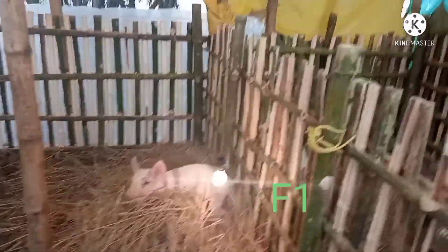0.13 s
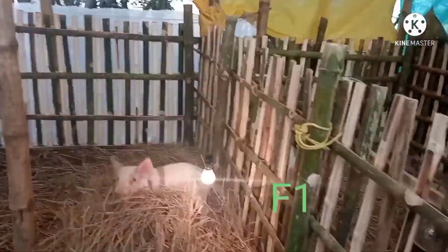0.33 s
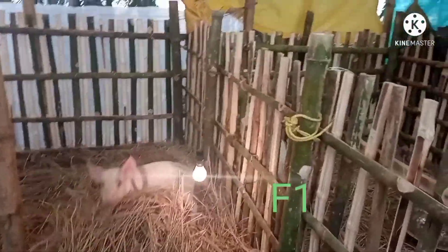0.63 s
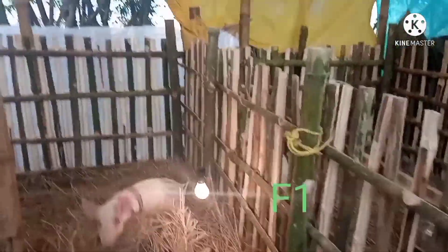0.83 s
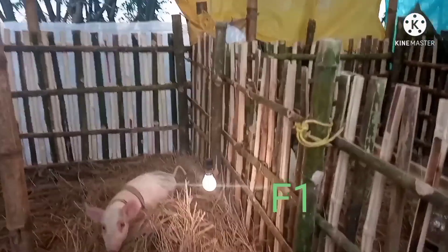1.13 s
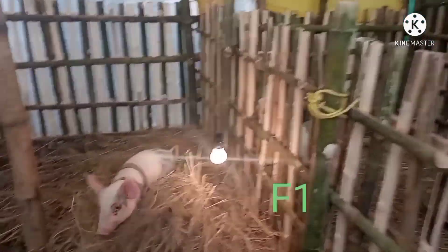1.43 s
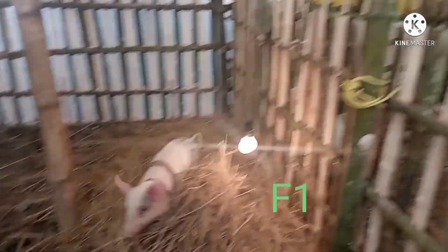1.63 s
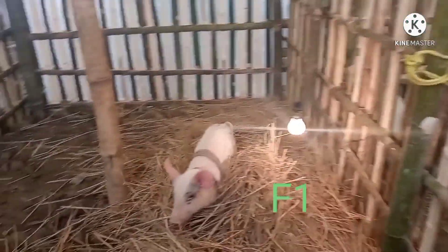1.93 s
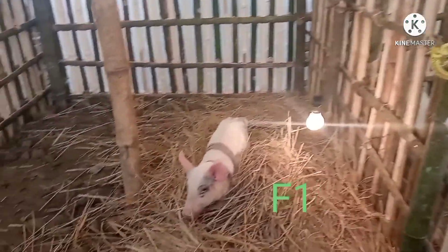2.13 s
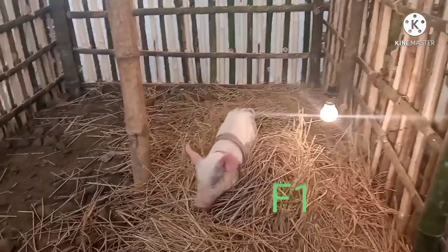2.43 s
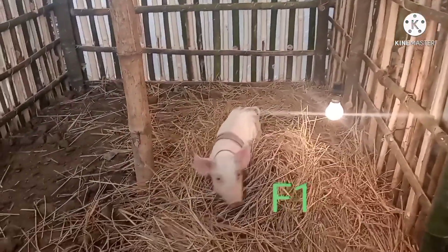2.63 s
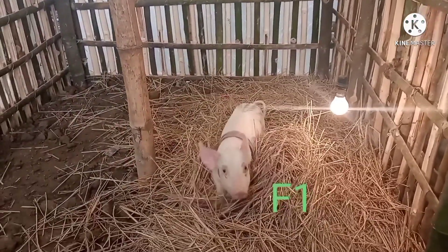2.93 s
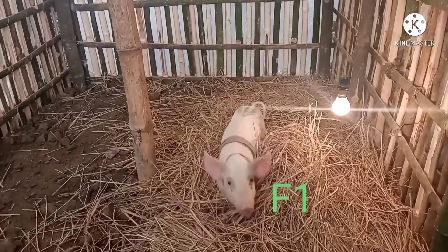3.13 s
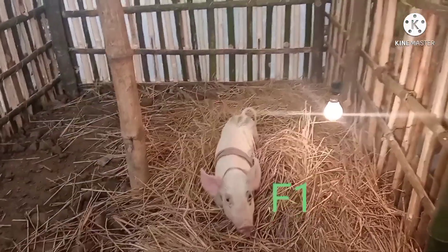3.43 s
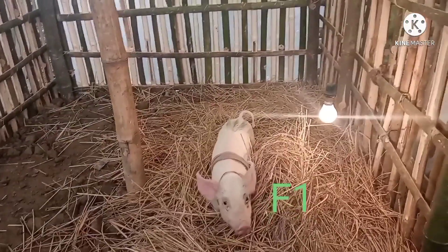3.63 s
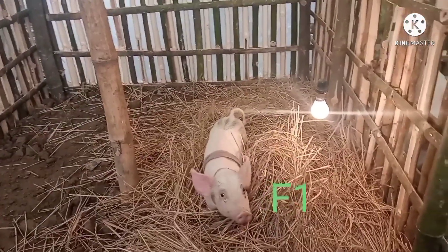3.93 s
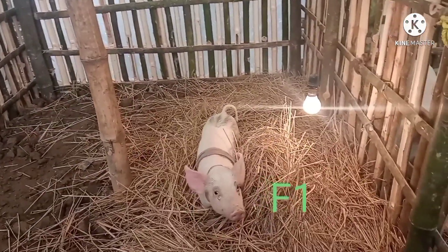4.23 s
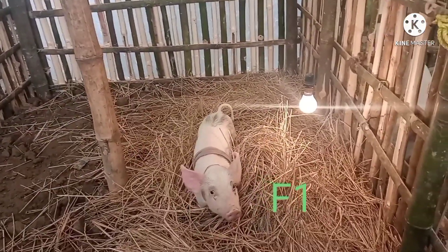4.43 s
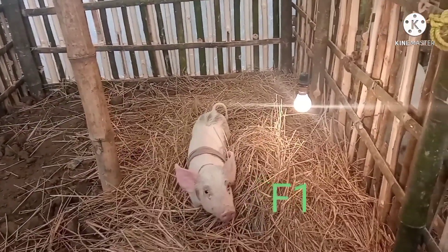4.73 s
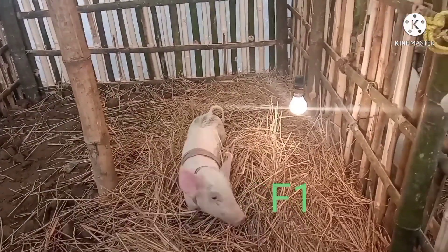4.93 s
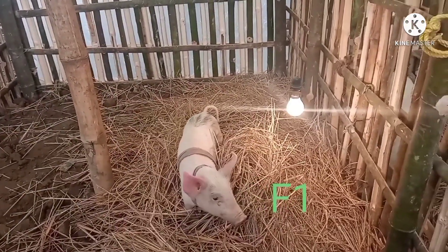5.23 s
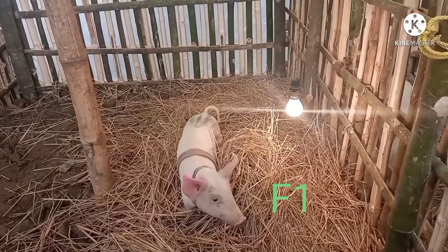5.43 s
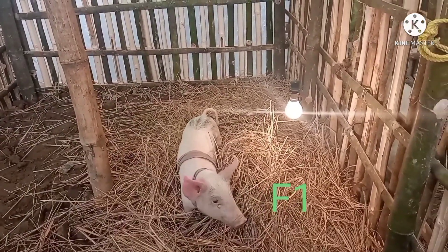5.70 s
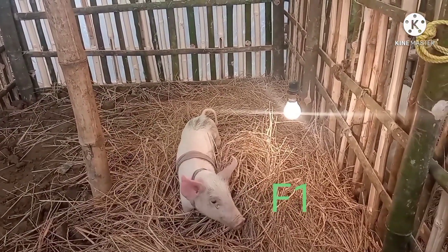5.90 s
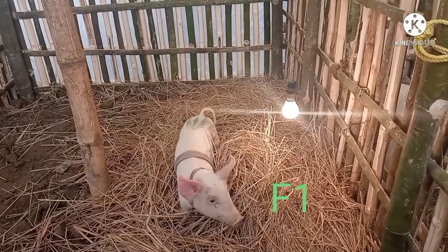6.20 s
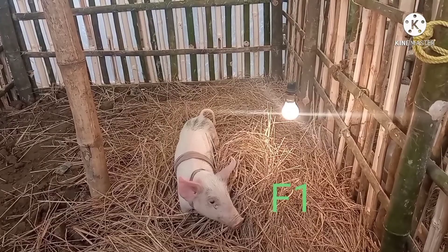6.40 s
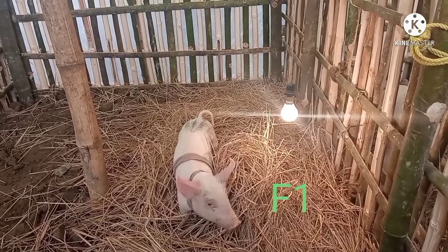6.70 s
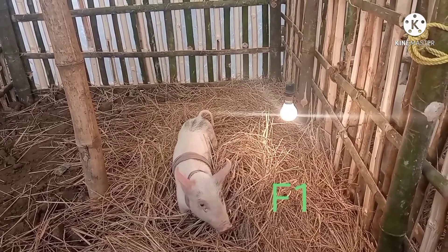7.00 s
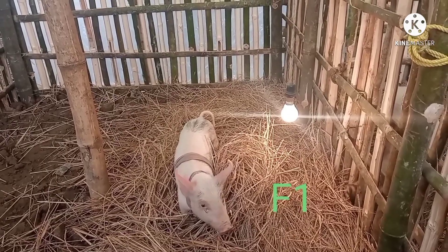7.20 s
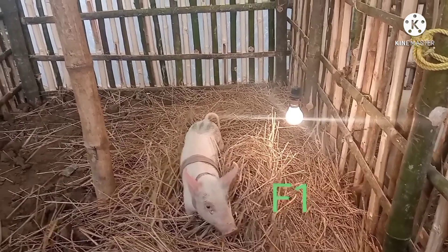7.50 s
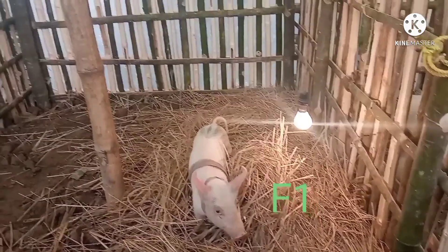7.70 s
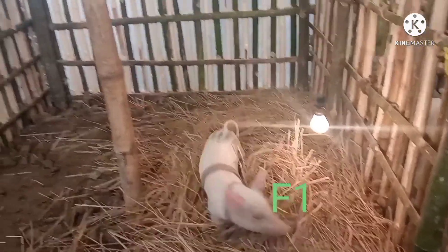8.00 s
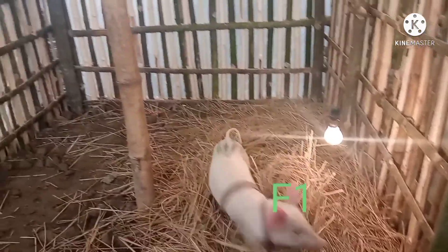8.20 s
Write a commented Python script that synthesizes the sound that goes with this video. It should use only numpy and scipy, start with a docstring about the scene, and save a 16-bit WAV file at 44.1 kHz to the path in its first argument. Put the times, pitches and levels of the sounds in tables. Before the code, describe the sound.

Dry straw rustles from the start, with two quick clicks in the first 0.3 seconds. The crackling hiss comes in swells and is strongest around 1.5 seconds. A piglet gives short, soft grunts, a very faint one near 0.8 seconds and clearer ones at about 1.2, 3.1, 3.6 and 5.5 seconds. From about 2.4 seconds a faint, distant bird repeats a falling whistle roughly once a second, joined by tiny peeps and coos. After 4 seconds the straw settles into lighter shuffles, scuffs and dull far knocks. At about 6.9, 7.5 and 8.1 seconds come three hard, close knocks on wood, by far the loudest sounds, each cracking and ringing with a short echo. A sharp tick and another grunt fall at 8 seconds, and the straw swells again at the end. A low outdoor hiss and rumble lies underneath throughout.

```python
"""A straw pen in a yard. A piglet grunts: uneven vocal-fold pulses and breath ring its throat,
mouth and snout. Wood is knocked three times, hard and near, cracking, ringing and echoing.
Birds whistle and coo far off. The straw rustles in swells of crackling hiss, with ticks,
scuffs and dull far knocks, over the yard's own hiss, murmur and rumble."""
import sys
import numpy as np
from scipy import signal
from scipy.io import wavfile
from scipy.ndimage import uniform_filter1d

SR = 44100
rng = np.random.default_rng(int(sys.argv[2]) if len(sys.argv) > 2 else 0)


def master(y):
    """Save y as 16-bit WAV."""
    cut = np.clip(np.atleast_2d(y).T, -1, 1)
    pcm = np.round(cut * 32767)  # scale
    wavfile.write(sys.argv[1], SR, pcm.astype(np.int16))


N = 368235

# Grunts: start_s, length_s, attack_s, level_db, lead_s, lead_rate_hz, body_rate_hz,
# mouth_start_hz, mouth_end_hz, mouth_db, rasp_db, rasp_tilt_db_per_octave, breath_share
GRUNTS = [(0.758, 0.1466, 0.08, -62, 0.00017, 96, 101.4, 630, 607, 3, -29, 0, .6),
          (1.213, 0.2094, 0.08, -46.5, .024, 249, 122, 716, 702, -11.5, -9, 4, 0.63),
          (3.054, 0.191, 0.1513, -43, 0.00041, 90, 91.3, 542, 855, 2.5, 7, -9.5, .65),
          (3.613, 0.14, 0.0775, -45, 0.0316, 300.6, 174, 917, 902, 1.5, -28.5, 2.5, .55),
          (5.469, .17, 0.0307, -43, .025, 265, 138, 795, 762, -8.5, -14.5, 13, .6),
          (7.994, .11, 0.0204, -42, .052, 65, 125, 851, 813, 0.5, 0.5, 18.5, .35),
          (8.207, 0.164, 0.027, -56.5, 0.003, 49.4, 50, 597, 610, -14.5, -31, 0, .2)]
# Chest and throat resonances: centre_hz, width_hz, gain_db
THROAT_RESONANCES = [(129.6, 34.7, 11.5), (247.8, 118.4, 4), (345.7, 363, -6.5)]
# Snout resonances: centre_hz, width_hz, gain_db
SNOUT_RESONANCES = [(1605, 1230, -2.5), (1829, 344, 5), (2370, 476, 8), (2662, 210, 10.5),
                    (4600, 1100, -19), (7255, 246, -29)]


def grunt(length_s, attack_s, level_db, lead_s, lead_rate_hz, body_rate_hz,
          mouth_start_hz, mouth_end_hz, mouth_db, rasp_db, tilt_db_per_octave, breath_share):
    """Uneven vocal-fold pulses and breath ring the throat, mouth and snout."""
    t = np.arange(0, length_s, 1 / SR)
    progress = t / length_s
    rate_hz = np.where(t < lead_s, lead_rate_hz, body_rate_hz * (1 - .25 * progress))
    jitter = unit_rms(uniform_filter1d(rng.standard_normal(len(t)), size=300))
    cycles = np.cumsum(rate_hz * (1 + .2 * breath_share * jitter)) / SR
    openings = np.diff(np.floor(cycles), prepend=0)
    pulses = unit_rms(openings * amp(2.5 * rng.standard_normal(len(t))) / np.sqrt(rate_hz))
    # Air leaks after each opening.
    puffs = unit_rms(np.exp(-(cycles % 1) / .5) * rng.standard_normal(len(t)))
    drive = (1 - breath_share) * pulses + breath_share * puffs
    low_drive = butterworth(pulses + .15 * puffs, 3, [90, 650], "band")
    throat = sum(amp(db) * resonate(low_drive, hz, width) for hz, width, db in THROAT_RESONANCES)
    soft_drive = butterworth(drive, 6, 1150, "low")  # flesh swallows the treble
    mouth_hz = mouth_start_hz + (mouth_end_hz - mouth_start_hz) * progress
    mouth = resonate(soft_drive, mouth_hz, width_hz=176.5)
    rasp = sum(amp(db + tilt_db_per_octave * np.log2(hz / 2700)) * resonate(drive, hz, width)
               for hz, width, db in SNOUT_RESONANCES)
    # The mouth opens just after the start and closes late.
    gape_db = -7 * np.maximum(1 - t / .0245, 0) - 18 * progress ** 2
    voice = (amp(mouth_db + gape_db) * unit_rms(mouth)
             + amp(rasp_db - 10.5 * progress ** 2) * unit_rms(rasp) - unit_rms(throat))
    effort_db = level_db - 17.5 * np.maximum(1 - t / attack_s, 0) ** 2 - 29 * progress ** 4.57
    return amp(effort_db) * voice * signal.windows.tukey(len(t), .15)


# Blows on wood: start_s, level_db, contact_s
KNOCKS = [(6.946, -16, 0.0107), (7.549, -13.5, 0.01084), (8.134, -13.5, 0.01187)]
# Wood modes: pitch_hz, gain_db, t60_s
WOOD_MODES = [(475.8, 4, 0.11), (644.6, -2.5, 0.08), (806, -6, .06), (957, -1, 0.076),
              (1291.4, -3.5, 0.156), (1552, -1.5, 0.197), (1795, -6, .08), (1925, -3, 0.14),
              (2263, 0.5, 0.19), (2420, -5.5, 0.15), (2598.6, 9.5, 0.048), (3205, -10.5, 0.22),
              (3700, -16, .1), (4472, -4.5, .05)]
# Contact spectrum: frequency_hz, density_db
CRACK_SPECTRUM = [(60, -30), (150, -3.5), (310, -35), (470, -4), (1100, -9.5), (2200, -1.5), (2650, -2.5),
                  (2900, -16.5), (3500, -11.5), (3950, -23), (4450, -19), (5500, -28), (7000, -23.5),
                  (9000, -44), (15000, -54.5)]


def knocks():
    """A rattling contact cracks, rings the wood's modes and echoes round the yard."""
    out, t = np.zeros(N), np.arange(SR // 3) / SR
    for start_s, level_db, contact_s in KNOCKS:
        contact = np.clip(t / .00261, 0, 1) ** 2 / (1 + (t / contact_s) ** 4)
        crack = noise(CRACK_SPECTRUM, len(t), patchy_db=.5) * contact
        ring = sum(amp(db - 60 * t / t60_s) * np.sin(2 * np.pi * (hz * t + rng.random()))
                   for hz, db, t60_s in WOOD_MODES)
        direct = crack + amp(-10) * ring * np.clip(t / .00406, 0, 1)
        add(out, start_s - .003, amp(level_db - 3.5) * direct)
        add(out, start_s + .015, amp(level_db - 16.5) * direct)  # slap from the nearest wall
        add(out, start_s + .005, amp(level_db - 15) * signal.fftconvolve(crack, yard_tail()))
    return out


# Steady rustle: time_s, level_db
RUSTLE_LEVELS = [(0, -56), (.9, -51), (1.23, -51.5), (1.35, -44.5), (1.63, -40.5), (1.85, -45),
                 (2.09, -47.5), (2.17, -55.5), (2.52, -60), (2.82, -59.5), (2.95, -50.5), (3.63, -54),
                 (3.79, -61), (4.44, -74), (4.8, -77.5), (5.16, -53), (5.44, -60.5), (5.6, -59),
                 (5.68, -74.5), (6.55, -70), (7.6, -71.5), (7.9, -81), (8.35, -79.5)]
# Single shuffles: peak_s, rise_s, hold_s, level_db
SHUFFLES = [(0, .02, 0.0023, -41), (0.327, 0.223, 0.0743, -46.5), (0.719, 0.081, 0.0563, -43),
            (0.987, 0.06, 0.138, -47), (2.383, .03, 0, -55), (2.649, 0.148, 0.105, -57),
            (3.07, 0.101, 0.1, -46), (4.497, 0.012, 0.14, -63.5), (5.868, 0.38, 0.066, -55.5),
            (6.15, 0.036, 0, -61), (6.607, 0.028, 0.051, -55), (7.333, 0.058, 0, -62),
            (7.945, 0.0316, 0, -57.5), (8.038, 0.0306, .1, -54), (8.177, 0.048, .2, -45)]
# Straw spectrum: frequency_hz, density_db
STRAW_SPECTRUM = [(600, -45), (1010, -15), (2250, -7), (4130, -11), (6500, 0), (7600, -2), (8200, -7),
                  (9720, -5), (13600, -9), (14600, -3), (16000, -2)]


def straw():
    """Steady rustle, shuffles and a jolt from each near knock add in power; single stalks snap."""
    t = np.arange(N) / SR
    power = amp(level_curve(RUSTLE_LEVELS)) ** 2
    for peak_s, rise_s, hold_s, level_db in SHUFFLES:
        rise_db = -19 * np.maximum(peak_s - t, 0) / rise_s
        fall_db = -100 * np.maximum(t - peak_s - hold_s, 0)
        power += amp(level_db + rise_db + fall_db) ** 2
    for start_s, level_db, _ in KNOCKS:
        power += (t > start_s) * amp(level_db - 34 - 400 * abs(t - start_s)) ** 2
    rustle_db = 10 * np.log10(power)
    clumps = unit_rms(uniform_filter1d(uniform_filter1d(rng.standard_normal(N), size=900), size=500))
    rustle_db += np.clip(-.08 * (rustle_db + 45), .3, 2.5) * clumps  # fainter is clumpier
    snaps = amp(.48 * np.minimum(rng.exponential(1, N), 6)) * (rng.random(N) < .004)
    rustle = (1 + snaps) * noise(STRAW_SPECTRUM, N, patchy_db=1)
    fizz = signal.sosfiltfilt(signal.butter(2, 11000, "high", fs=SR, output="sos"), rustle)
    fizz_loss = 1 - np.clip(amp(.58 * (rustle_db + 50)), 0, 1)  # fainter is duller
    return amp(rustle_db) * (rustle - fizz_loss * fizz)


# Ticks and bumps: start_s, level_db, pitch_hz, decay_cycles
TICKS = [(0.174, -34, 942, 0.52), (.271, -24, 466, 0.753), (0.28, -36, 142.5, 0.505),
         (1.614, -44, 125, 0.95), (1.639, -50, 263, 1.18), (4.506, -44, 6580, 5.1),
         (7.959, -41, 1510, 1.12), (7.961, -22.5, 1760, 0.645)]


def ticks():
    """Each tick or bump is a few damped cycles."""
    out = np.zeros(N)
    for start_s, level_db, pitch_hz, decay_cycles in TICKS:
        cycles = np.arange(0, 4 * decay_cycles, pitch_hz / SR)
        envelope = cycles / decay_cycles * np.exp(-2 * cycles / decay_cycles)
        add(out, start_s - .001, amp(level_db + 12) * envelope * np.sin(2 * np.pi * cycles))
    return out


# Dull far knocks and scuffs in the straw: start_s, length_s, centre_hz, width_hz, level_db
FAR_KNOCKS_AND_SCUFFS = [(0.271, 0.227, 386, 517, -48), (4.069, 0.0774, 1100, 1750, -55.5),
                         (4.491, 0.123, 7050, 5060, -64.5), (4.582, 0.0925, 1100, 1200, -63),
                         (6.121, 0.107, 2210, 1500, -55), (6.156, 0.078, 1095, 1710, -54),
                         (6.467, 0.088, 788, 1210, -58), (6.599, 0.575, 910, 970, -64),
                         (7.25, 0.425, 1028, 1540, -55.5)]


def far_knocks_and_scuffs():
    """Grainy bursts fade, each with a hollow ring under it."""
    out = np.zeros(N)
    for start_s, length_s, centre_hz, width_hz, level_db in FAR_KNOCKS_AND_SCUFFS:
        progress = np.linspace(0, 1, round(length_s * SR))
        grains = rng.standard_normal(len(progress)) * (rng.random(len(progress)) < .06)
        burst = unit_rms(resonate(grains, centre_hz, width_hz))
        hollow = unit_rms(resonate(grains, centre_hz=553, width_hz=220))
        envelope = amp(level_db - 26.1 * progress) * signal.windows.tukey(len(progress), .4)
        add(out, start_s, envelope * (burst + amp(-7) * hollow))
    return out


# Repeated whistle: step_s, held_s, level_db
WHISTLES = [(2.424, 0.268, -59.5), (3.501, 0.254, -61.5), (4.618, 0.266, -60.5), (5.574, 0.121, -58),
            (6.396, .235, -59.5), (7.263, 0.169, -58.5)]
# Peeps and coos: start_s, length_s, start_hz, end_hz, level_db
PEEPS_AND_COOS = [(.96, 0.14, 537.4, 518, -76), (3.675, 0.252, 5154, 5400, -72),
                  (3.974, 0.203, 4500, 4407, -74), (4.106, 0.114, 770, 657.5, -68),
                  (4.633, 0.365, 621.1, 581, -74), (5.291, .28, 700, 635, -72),
                  (5.449, 0.059, 4210, 4105, -62.5), (5.648, 0.203, 625, 582, -72.5),
                  (5.924, 0.043, 868, 799.5, -64.5), (5.959, 0.22, 5150, 5230, -70),
                  (6.269, 0.107, 2010, 1972, -65), (6.405, 0.108, 4270, 4109, -68.5),
                  (6.641, 0.33, 728, 705.5, -73.5)]


def birds():
    """Whistles slide, then step down to a held note; peeps and coos glide. All trail an echo."""
    out = np.zeros(N)
    slide_s, overlap_s = .078, .0068
    slide_hz = np.linspace(3889, 3400, round(slide_s * SR))
    for step_s, held_s, level_db in WHISTLES:
        held_hz = 2903 + 200.43 * np.exp(-np.arange(0, held_s, 1 / SR) / .09)
        add(out, step_s - slide_s + overlap_s, bird_note(slide_hz, level_db - 10))
        add(out, step_s, bird_note(held_hz, level_db))
    for start_s, length_s, start_hz, end_hz, level_db in PEEPS_AND_COOS:
        add(out, start_s, bird_note(np.linspace(start_hz, end_hz, round(length_s * SR)), level_db))
    return out + amp(-2.5) * signal.fftconvolve(out, yard_tail())[:N]


def bird_note(pitch_hz, level_db, fade_db_per_s=16.5):
    """A far tone blurred by leaves, fading as it is held."""
    t = np.arange(len(pitch_hz)) / SR
    blur = unit_rms(resonate(rng.standard_normal(len(t)), pitch_hz, 40 + pitch_hz[-1] / 65))
    pure = np.sqrt(2) * np.sin(2 * np.pi * np.cumsum(pitch_hz) / SR)
    envelope = amp(level_db - fade_db_per_s * t) * signal.windows.tukey(len(t), .2)
    return envelope * (.35 * pure + .7 * blur)


# Echo decay: frequency_hz, t60_s
YARD_DECAY = [(200, 0.49), (500, 0.354), (1500, 0.436), (2500, 0.352), (5000, 0.544), (12000, 0.05)]


def yard_tail():
    """Dense echoes from fences and sheds, each band dying at its own speed."""
    hz, t, spectra = signal.stft(rng.standard_normal(SR // 2), SR, nperseg=256)
    decay = amp(-60 * t / log_interp(YARD_DECAY, hz)[:, None])
    tail = signal.istft(spectra * decay, SR, nperseg=256)[1]
    return tail / np.linalg.norm(tail)


# Yard hiss swells: time_s, level_db
HISS_LEVELS = [(0, -70.5), (.72, -59), (1.12, -56), (1.93, -54.5), (2.09, -62), (2.63, -68.5), (3.44, -60),
               (4.04, -65), (4.21, -74), (4.51, -78.5), (5.0, -65), (5.18, -60), (5.58, -66.5),
               (5.75, -62.5), (6.44, -68), (6.98, -67.5), (7.2, -64.5), (8.1, -64.5), (8.35, -56.5)]
# Yard hiss spectrum: frequency_hz, density_db
HISS_SPECTRUM = [(900, -65), (1400, -14.5), (1900, -5.5), (2600, 3.5), (3100, -10), (4200, -16.5),
                 (6500, -15), (12000, -24)]
# Murmur spectrum: frequency_hz, density_db
MURMUR_SPECTRUM = [(60, -4.5), (150, 4.5), (400, 2.5), (800, 4.5), (1300, -5.5), (2000, -42)]


def yard_background():
    """Hiss swells, a murmur half follows it, and a lumpy rumble stays underneath."""
    rumble = unit_rms(butterworth(rng.standard_normal(N), 2, [40, 120], "band"))
    lumps_db = 2.5 * unit_rms(uniform_filter1d(rng.standard_normal(N), size=4000))
    hiss_db = level_curve(HISS_LEVELS)
    hiss = amp(hiss_db) * noise(HISS_SPECTRUM, N, patchy_db=4.5)
    murmur = amp(-49.5 + .4976 * hiss_db) * noise(MURMUR_SPECTRUM, N, patchy_db=-3)
    return hiss + murmur + amp(-76.5 + lumps_db) * rumble


def noise(spectrum, samples, patchy_db):
    """Unit-RMS coloured noise with drifting patches."""
    frames, hz = samples // 128 + 6, np.fft.rfftfreq(512, 1 / SR)
    real, imag, patches = rng.standard_normal((frames, 257, 3)).T
    patches = unit_rms(uniform_filter1d(uniform_filter1d(patches, size=7, axis=0), size=20, axis=1))
    spectra = (real + 1j * imag) * amp(log_interp(spectrum, hz)[:, None] + patchy_db * patches)
    return unit_rms(signal.istft(spectra, nperseg=512, noverlap=384)[1][:samples])


def resonate(x, centre_hz, width_hz):
    """Steep, movable resonance: shift the centre to 0 Hz, smooth twice, shift back."""
    carrier = np.exp(2j * np.pi * np.cumsum(centre_hz * np.ones(len(x))) / SR)
    pole = np.exp(-np.pi * width_hz / SR)
    smoothed = signal.lfilter([(1 - pole) ** 2], [1, -2 * pole, pole * pole], x / carrier)
    return 2 * (carrier * smoothed).real


def butterworth(x, order, cutoff_hz, kind):
    return signal.sosfilt(signal.butter(order, cutoff_hz, kind, fs=SR, output="sos"), x)


def level_curve(rows):
    time_s, level_db = np.transpose(rows)
    return np.interp(np.arange(N) / SR, time_s, level_db)


def log_interp(rows, hz):
    row_hz, values = np.transpose(rows)
    return np.interp(np.log(hz + 1), np.log(row_hz + 1), values)


def amp(db):
    return 10 ** (np.asarray(db) / 20)


def unit_rms(x):
    return x / np.sqrt(np.mean(x ** 2) + 1e-20)


def add(mix, start_s, sound):
    part = mix[round(start_s * SR):][:len(sound)]
    part += sound[:len(part)]


def scene():
    """All sources reach one microphone."""
    mix = straw() + yard_background() + birds() + knocks() + ticks() + far_knocks_and_scuffs()
    for start_s, *settings in GRUNTS:
        add(mix, start_s, grunt(*settings))
    return np.array([mix, mix])


def record(dry):
    """The microphone drops the deep bass; a band limit cuts the top treble."""
    low_cut_hz, high_cut_hz = 70, 15650
    band_limit = signal.firwin(511, high_cut_hz, window=("kaiser", 9), fs=SR)
    return signal.oaconvolve(butterworth(dry, 2, low_cut_hz, "high"), band_limit[None], "same")


dry = scene()
out = record(dry)
master(out)
```